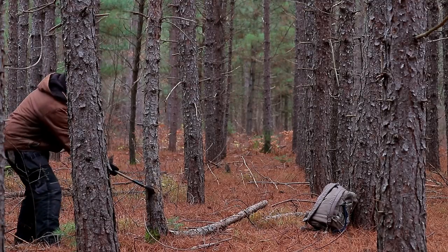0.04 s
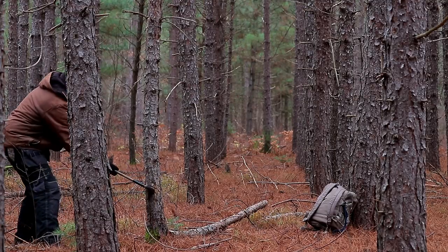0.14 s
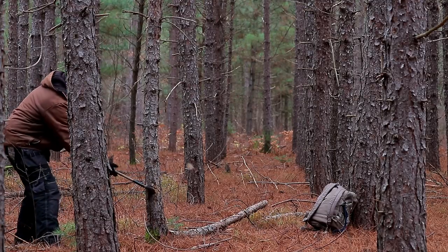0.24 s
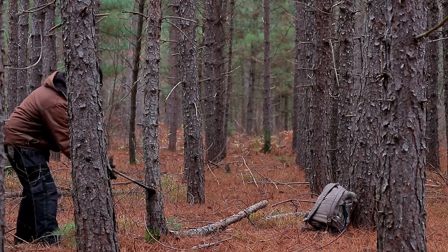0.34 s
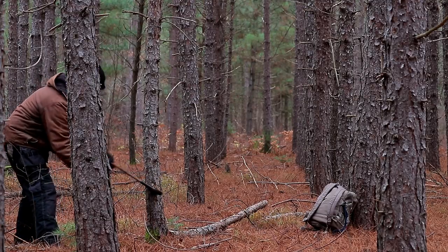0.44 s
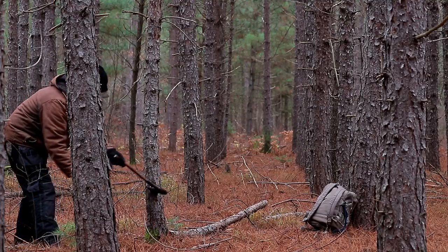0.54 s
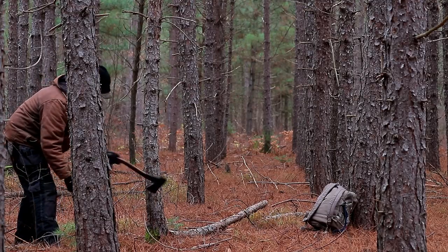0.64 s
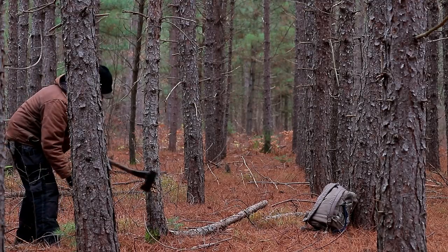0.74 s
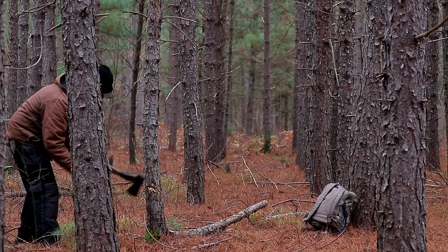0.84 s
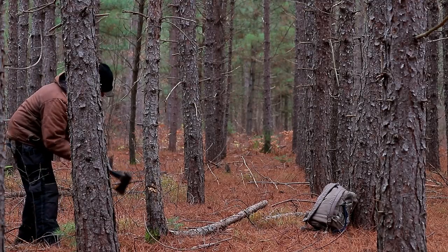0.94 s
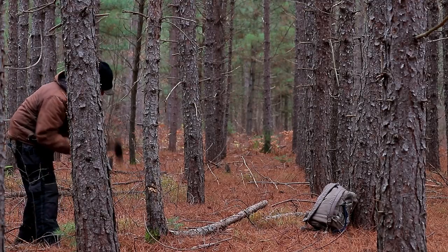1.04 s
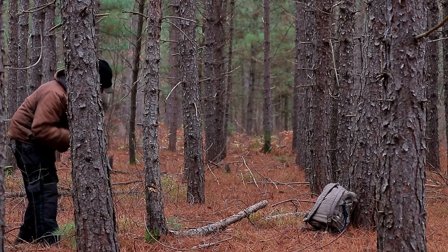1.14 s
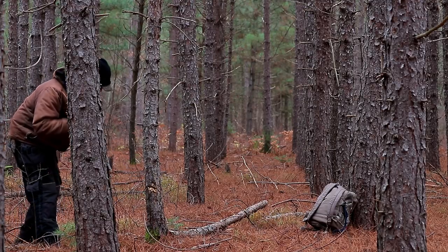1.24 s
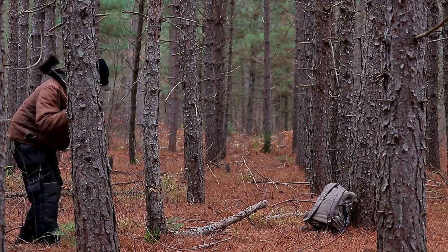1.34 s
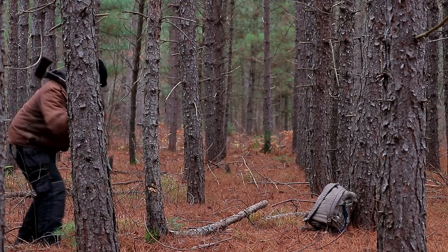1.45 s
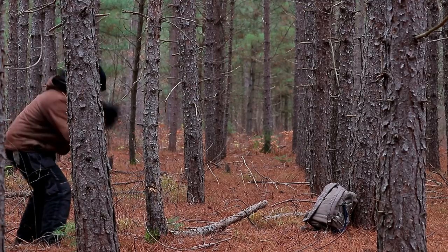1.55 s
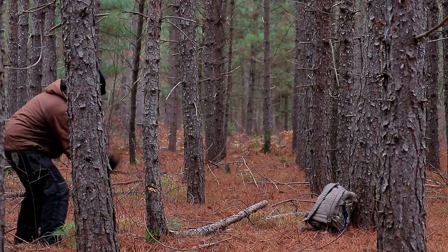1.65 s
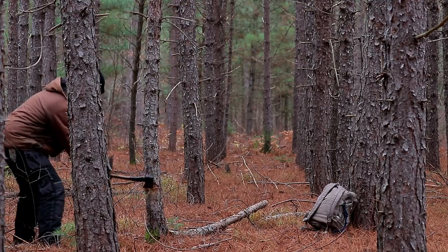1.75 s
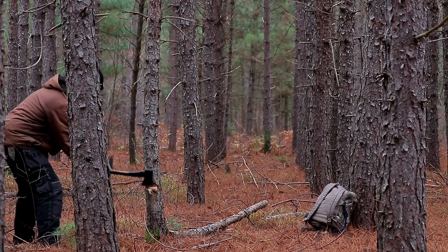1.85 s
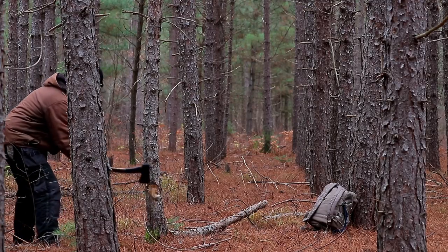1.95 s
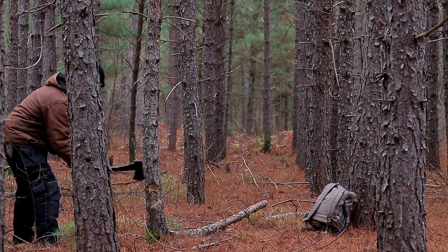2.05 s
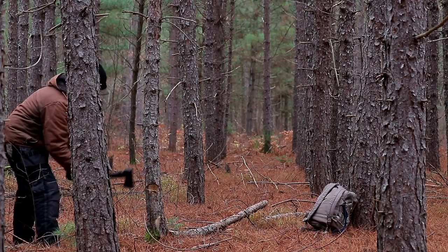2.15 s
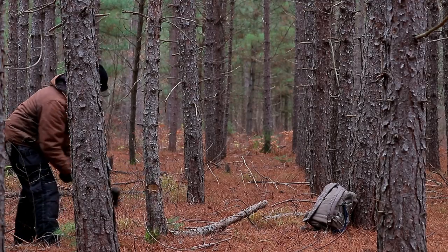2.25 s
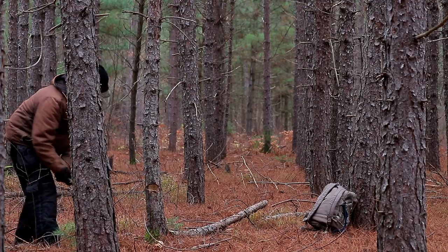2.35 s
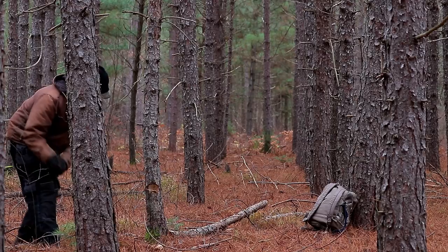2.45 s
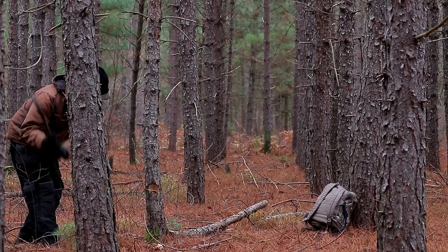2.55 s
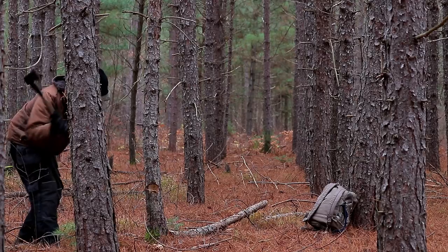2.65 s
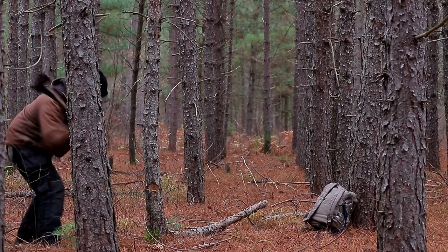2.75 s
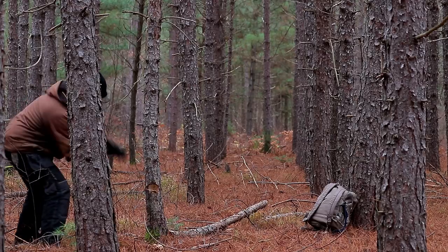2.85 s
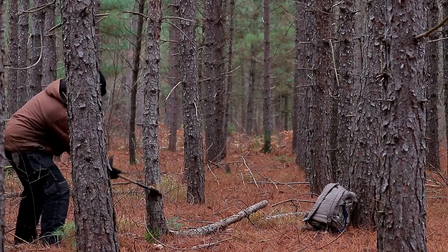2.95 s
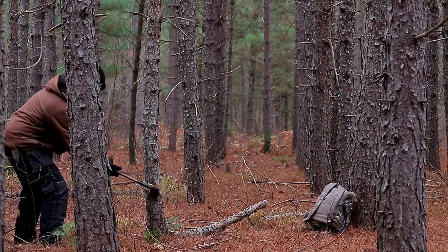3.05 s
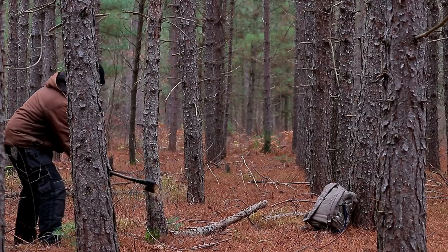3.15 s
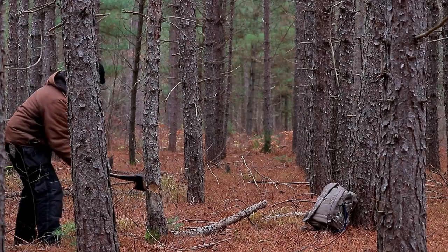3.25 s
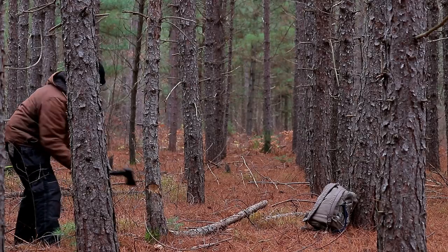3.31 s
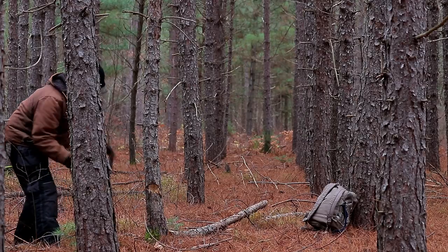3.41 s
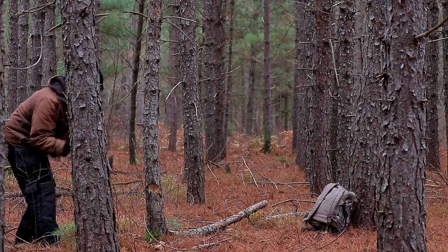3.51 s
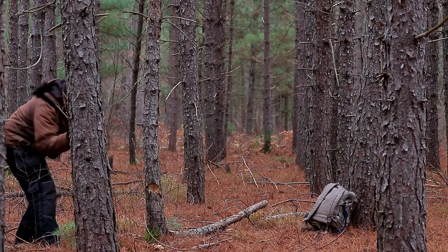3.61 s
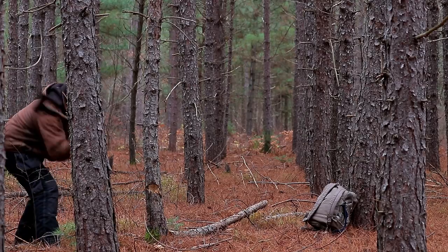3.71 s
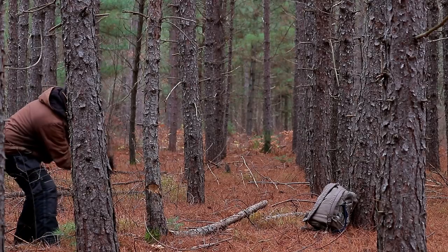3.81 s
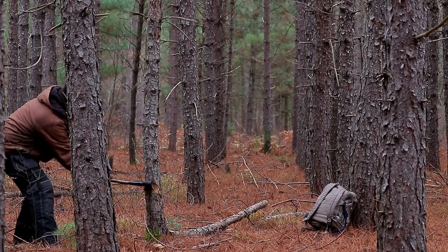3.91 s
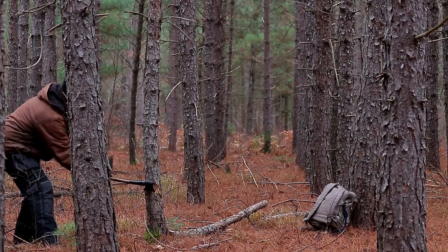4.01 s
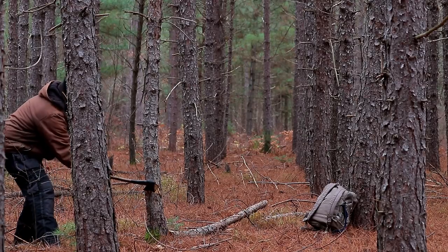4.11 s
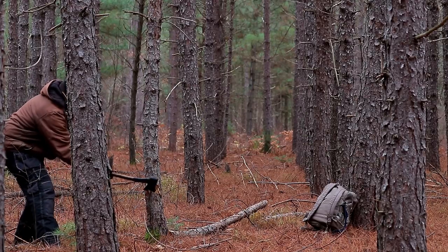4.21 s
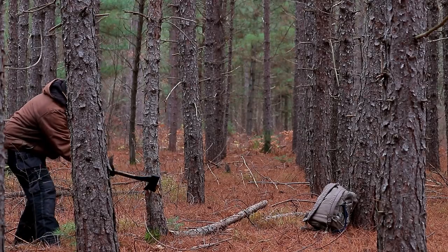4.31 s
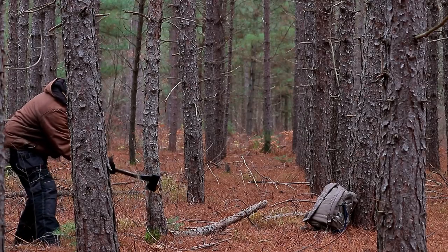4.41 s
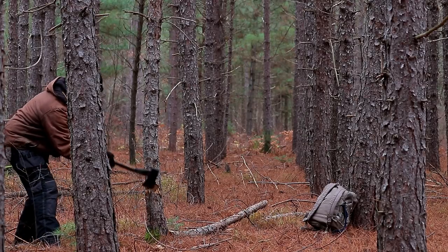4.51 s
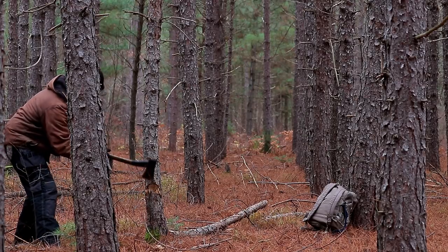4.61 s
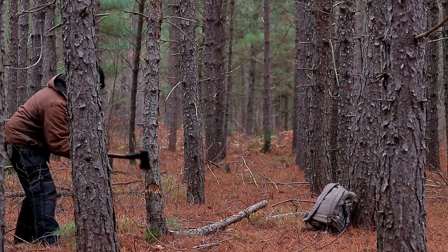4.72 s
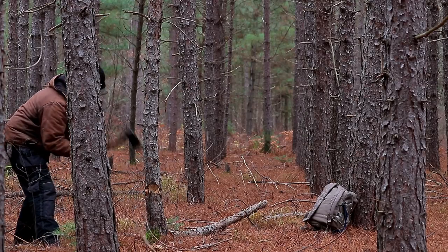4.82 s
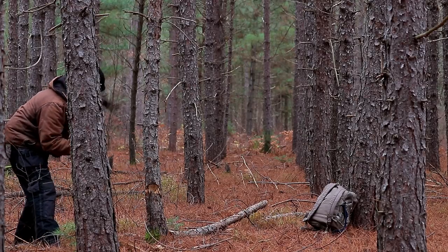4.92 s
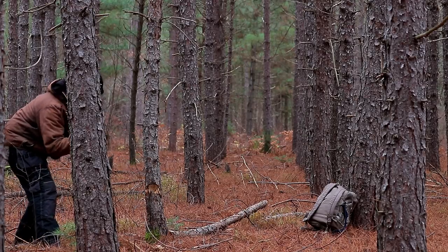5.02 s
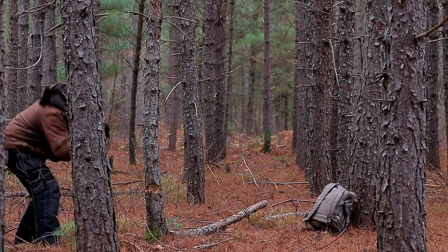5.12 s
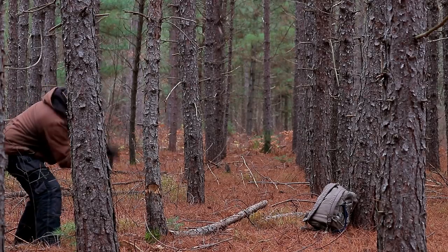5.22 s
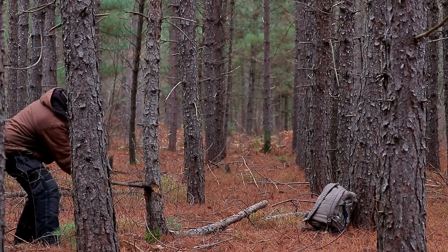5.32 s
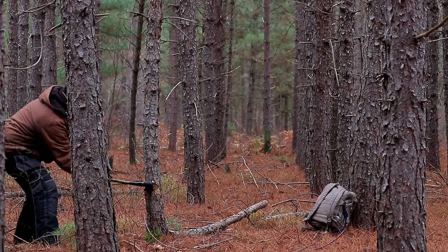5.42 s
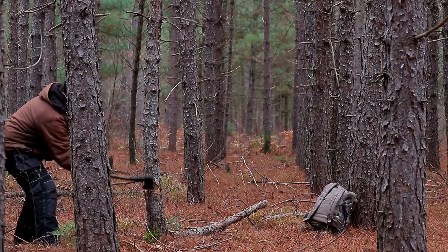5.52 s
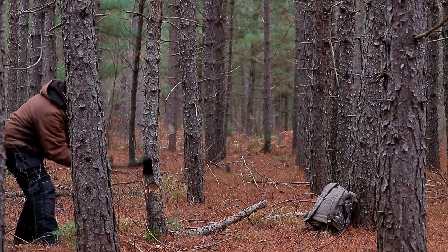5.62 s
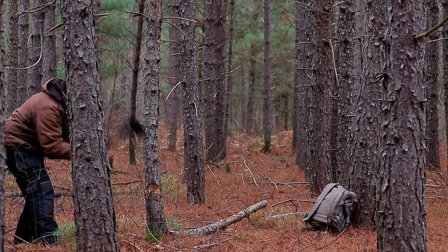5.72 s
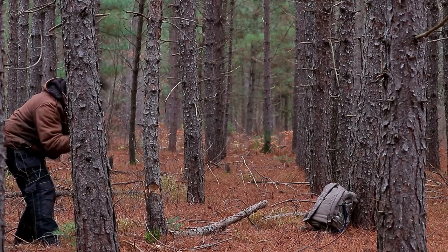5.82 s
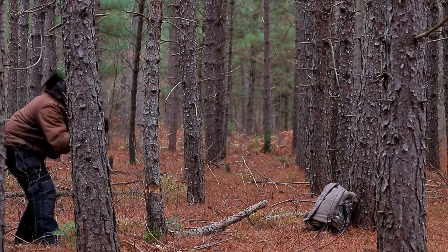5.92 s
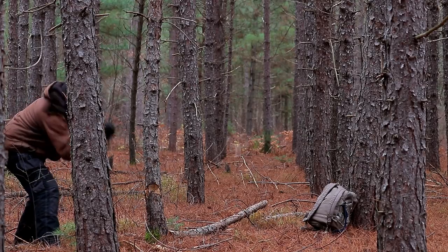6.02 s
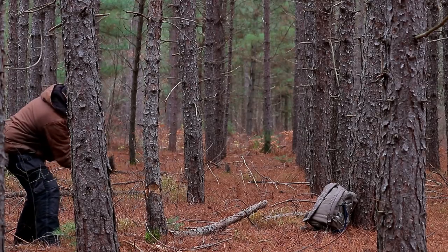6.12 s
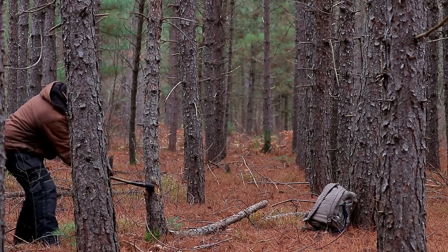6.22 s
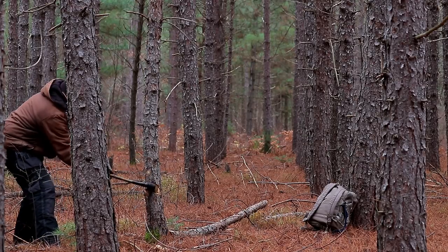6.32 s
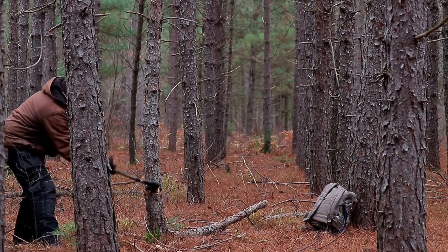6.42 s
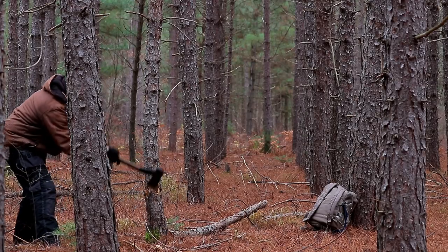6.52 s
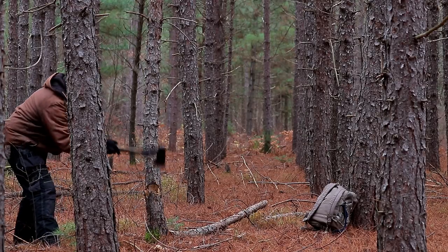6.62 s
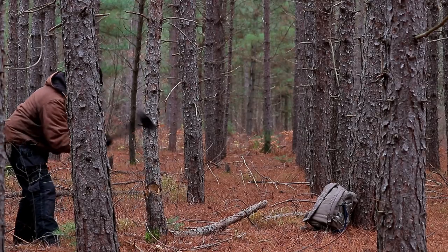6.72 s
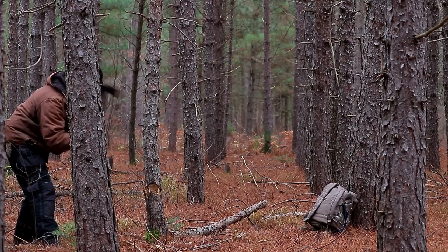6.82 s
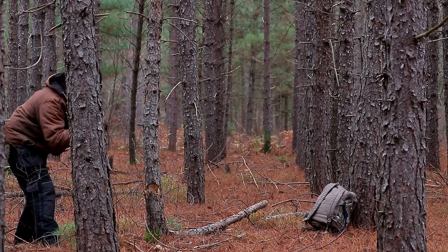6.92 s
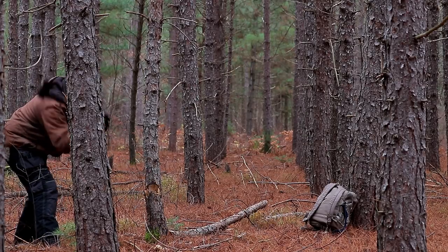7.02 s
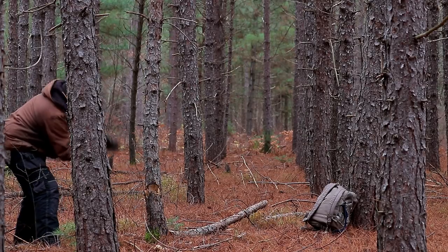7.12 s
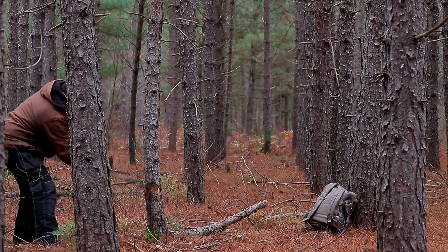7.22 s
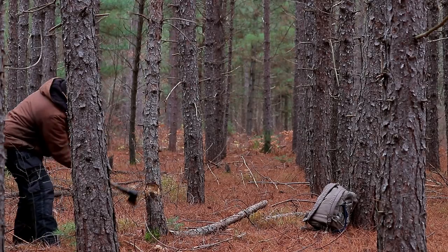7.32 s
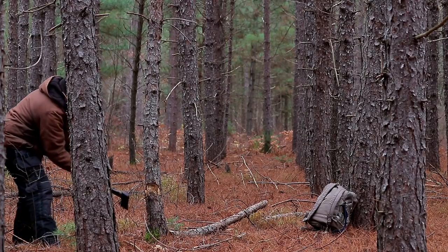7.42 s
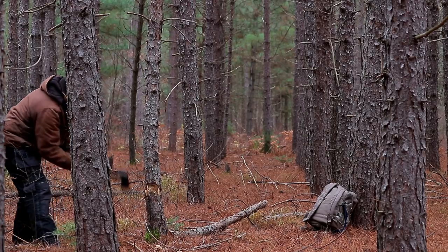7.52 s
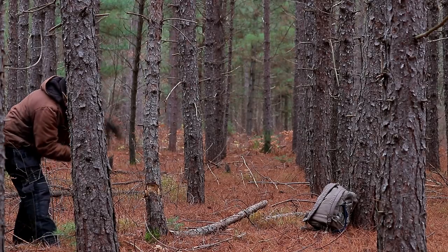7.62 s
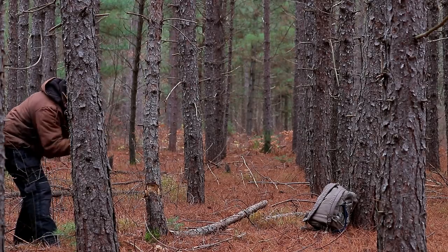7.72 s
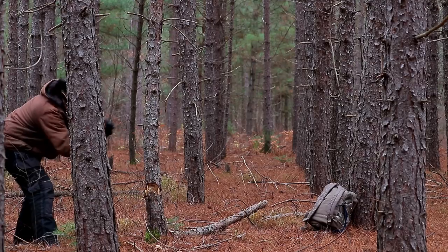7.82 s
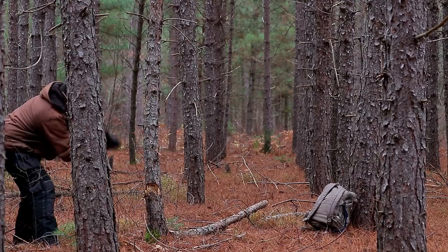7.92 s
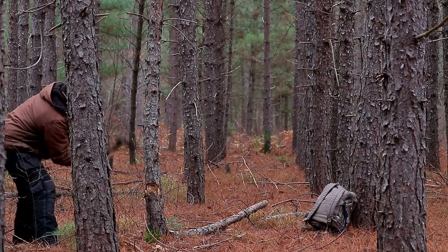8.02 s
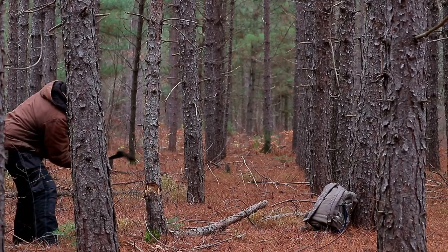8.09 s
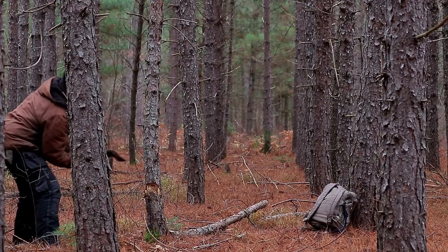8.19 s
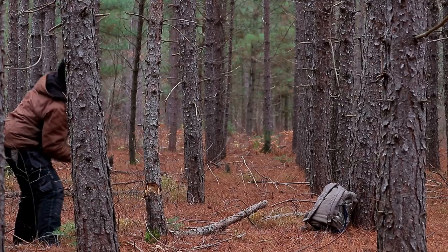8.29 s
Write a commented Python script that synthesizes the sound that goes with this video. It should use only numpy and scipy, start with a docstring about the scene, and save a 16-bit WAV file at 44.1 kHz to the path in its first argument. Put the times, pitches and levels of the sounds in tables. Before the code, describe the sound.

Quiet pine forest outdoors, medium-close microphone. Seven single axe blows bite into a living trunk, slightly over a second apart on average. Some are square, solid and knocking; others slice brighter and duller in the bass. Every hit scatters off surrounding trees and dies away quickly. Between hits come light taps of the loosened blade, chips and twigs, plus barely audible dry litter crackling, with soft far wind beneath.

```python
"""An axe blow into a standing pine is already under way at the start, a few metres off in a quiet forest.
In each of seven blows bark crumbles, torn fibres excite the modes of wood and axe head in a short
crack, and the shoved trunk answers with a low gliding thump; decaying noise is the scatter of the trees.
Under it lies a faint far rush of filtered noise. Needles and chips crackle as random grains, chips and
twigs tick as struck resonances, and after the first blow the blade squeaks twice by stick-slip."""
import sys
import numpy as np
from scipy import signal
from scipy.fft import rfft, irfft
from scipy.io import wavfile

SR = 44100
rng = np.random.default_rng(int(sys.argv[2]) if len(sys.argv) > 2 else 0)


def inscribe(sig):
    """Save sig as 16-bit PCM at rate SR to the path in sys.argv[1].

    A 1-D sig is mono; a 2-D sig holds one channel per row.
    Samples are clipped to [-1, 1] before scaling.
    """
    pcm = np.round(np.clip(np.atleast_2d(sig).T, -1, 1) * 32767)
    wavfile.write(sys.argv[1], SR, pcm.astype(np.int16))


N = 368235
TAIL = 65536        # length of each short sound and of the forest's answer [samples]
CUTOFF_HZ = 15900   # upper limit of the sound

# axe blows; slant 0 lands square, 1 slices along the grain:
# t/s, slant (0-1), crack level/dB, notch pitch f/Hz, swing level/dB, trunk ring level/dB,
# bark level/dB, falling chips level/dB
BLOWS = [(-.035, 0.47, 15.5, 1370, -12.5, -4, 0.5, -75), (1.6994, 1, 19.5, 2050, -17.5, -7, -5, -82),
         (2.9496, 0.67, 14.5, 2270, -12, -2, -3.5, -85), (3.8955, 0.14, 16, 867, -7.5, -2, -2.5, -76),
         (5.3313, .05, 18.5, 1240, -7, -3.5, 0.5, -78), (6.1837, 0.1, 16.5, 1130, -6, -5, -2.5, -78),
         (7.2314, 0.84, 11, 1250, -10, -3, 0, -81)]


def from_db(db):
    """Logarithmic level: 20 dB is a factor of ten in amplitude."""
    return 10 ** (np.asarray(db) / 20)


def rms_one(x):
    """Root-mean-square normalisation: scale to unit mean power."""
    return x / np.sqrt(np.mean(x ** 2) + 1e-20)


def at_hz(points, hz):
    """Logarithmic pitch scale: interpolate every column of a table against log frequency."""
    known, *columns = np.transpose(points)
    return [np.interp(np.log(hz), np.log(known), column) for column in columns]


def add(out, s, sound):
    """Superposition: pressures add, here from time s [s] on."""
    start = round(s * SR)
    part = sound[max(-start, 0):len(out) - start]
    first = max(start, 0)
    out[first:first + len(part)] += part


def lowpass(x, hz):
    """Causal second-order low-pass: level falls by 12 dB per octave above the corner."""
    return signal.sosfilt(signal.butter(2, hz, fs=SR, output="sos"), x)


def band(x, low_hz, high_hz):
    """Causal band-pass: only frequencies between two corners get through."""
    sos = signal.butter(2, [low_hz, high_hz], "band", fs=SR, output="sos")
    return signal.sosfilt(sos, x + 1e-18)


def resonate(x, hz, width):
    """Damped resonance with unit peak gain: the wider it is [Hz], the faster it decays."""
    r = np.exp(-np.pi * width / SR)
    zeros = np.array([1, 0, -1]) * (1 - r * r) / 2
    poles = [1, -2 * r * np.cos(2 * np.pi * hz / SR), r * r]
    return signal.lfilter(zeros, poles, x + 1e-18)


def fade(t60):
    """Exponential decay: amplitude falls by 60 dB in t60 [s]."""
    return np.exp(-np.log(1000) * np.arange(TAIL) / SR / t60)


def coloured(x, points):
    """Minimum-phase filtering by a table of f/Hz, level/dB: causal, so nothing sounds early."""
    hz = np.maximum(np.abs(np.fft.fftfreq(2 * TAIL, 1 / SR)), 1)
    level_db, = at_hz(points, hz)
    response = np.exp(signal.hilbert(np.log(from_db(level_db))).conj())
    return irfft(rfft(x, 2 * TAIL) * response[:TAIL + 1])[:TAIL]


def fracture(length_s, size=2048, count=12):
    """Broadband excitation: fibres snap in a dense burst of unit energy."""
    gate = np.exp(-(np.arange(size) / SR / length_s) ** 4)
    burst = rng.standard_normal(size) * gate
    for _ in range(count):   # each round spreads the burst more evenly over all pitches
        phase = np.angle(rfft(burst))
        burst = irfft(np.exp(1j * phase)) * gate
    return np.pad(burst / np.linalg.norm(burst), (0, TAIL - size))


def grains(per_s, spread_db):
    """Shot noise: independent tiny snaps of random sign and uneven size."""
    chance = rng.random(TAIL)
    sign = rng.choice([-1, 1], TAIL)
    size = np.minimum(rng.exponential(1, TAIL), 3)
    return (chance < per_s / SR) * sign * from_db(spread_db * size)


def bark(t60=.06, per_s=6000, spread_db=4):
    """Brittle fracture: bark breaks first and goes on crumbling as a decaying shower of snaps."""
    # colour of dry bark as it crumbles: f/Hz, level/dB
    bark_colour = [(300, 4), (1200, 11.5), (2500, 2.5), (4500, 0), (6500, -10), (9000, -15), (15000, -25)]
    crumbs = grains(per_s, spread_db) * fade(t60)
    return coloured(crumbs / np.linalg.norm(crumbs), bark_colour)


def by_slant(square, slicing, slant):
    """Linear blend from the value of a square blow to that of a slicing blow."""
    return np.interp(slant, [0, 1], [square, slicing])


def crack_colour(crack_db, slant, notch_hz, notch_db, notch_octaves=.18):
    """Resonant colouring: brighter with slant, with a hump where the chip being split off rings."""
    # crack of the wood: f/Hz, level of a square blow/dB, level of a slicing blow/dB
    crack_levels = [(500, 3.5, -6), (800, 2, -7), (1396.6, 2, -2), (2139, -3, -1.5), (3910, -12, 3),
                    (5100, -20, -8.5), (7958, -29.5, -21.5), (15900, -41.5, -41)]
    hz = np.geomspace(300, CUTOFF_HZ, 120)
    square, slicing = at_hz(crack_levels, hz)
    off_pitch = np.log2(hz / notch_hz) / notch_octaves
    hump = notch_db / (1 + off_pitch ** 2)
    return np.column_stack([hz, crack_db + square + slant * (slicing - square) + hump])


def crack(bite_s, colour, uneven_db=1.5):
    """Modal excitation: the blade tears into the notch; where it lands decides which modes speak."""
    # modes of notch and axe head: f/Hz, width/Hz, level/dB
    notch_modes = [(403, 110, 3.5), (720, 120, 3.5), (940, 180, 2.5), (1154, 270, -2), (1440, 220, 3),
                   (2000, 280, 3), (2376, 240, -1), (2647, 78, 1), (3190, 170, -3.5), (3400, 220, -6),
                   (3950, 340, 5), (4470, 300, 0.5), (5030, 350, -1.5), (5940, 1500, -12.5),
                   (6500, 170, -0.5), (7000, 500, -2), (8200, 430, -2.5), (10800, 3000, -8),
                   (13900, 4600, -12)]
    burst = fracture(bite_s, count=6)
    ring = np.zeros(TAIL)
    for hz, width, db in notch_modes:
        mode_db = db + uneven_db * rng.standard_normal()
        ring += from_db(mode_db) * resonate(burst, hz, width)
    return coloured(ring, colour)


def thump(swing_db, ring_db, shove_s, start_hz=205, end_hz=90, glide_s=.008, swell_s=0.0039, echo_hz=500):
    """Dispersive bending: the shoved trunk swings once, then rings in its modes; a slow shove is duller."""
    # bending modes of the trunk: f/Hz, level/dB, t60/s
    bending_modes = [(77.2, -21, 0.27), (100.2, -22, 0.22), (116.06, -25, 0.24), (146.1, -26, 0.23),
                     (205, -18, 0.12), (238.5, -18, 0.069)]
    # echoes off the nearest trees: delay t/s, level/dB
    near_trees = [(0.011, -16.5), (0.0204, -13), (0.052, -25.5)]
    t = np.arange(TAIL) / SR
    # short bending waves travel fastest and arrive first, so the pitch glides down
    hz = end_hz + (start_hz - end_hz) * np.exp(-t / glide_s)
    swell = (t / swell_s * np.exp(1 - t / swell_s)) ** 2
    swing = from_db(swing_db) * np.sin(2 * np.pi * np.cumsum(hz) / SR) * swell
    modes = sum(from_db(ring_db + db) * fade(t60) * np.sin(2 * np.pi * f * t) for f, db, t60 in bending_modes)
    build_up = 1 - fade(.05)
    shove = np.sin(np.pi * np.minimum(t / shove_s, 1)) ** 2
    direct = signal.fftconvolve(swing + build_up * modes, shove / shove.sum())[:TAIL]
    out, dull = direct.copy(), lowpass(direct, echo_hz)
    for delay_s, db in near_trees:
        add(out, delay_s, from_db(db) * dull)
    return out


def over_ground(x, delay_s=.00082, bounce_db=-11.5, top_hz=3600):
    """Comb interference: direct sound meets its duller bounce off the needle-covered ground."""
    out, gain = x.copy(), from_db(bounce_db)
    add(out, delay_s, gain * lowpass(x, top_hz))
    return out / np.hypot(1, gain)


def forest():
    """Multiple scattering: a quick answer off near trunks, then a far tail, decaying band by band."""
    # scatter among the trunks, levels before band filtering:
    # f/Hz, early level/dB, early t60/s, late level/dB, late t60/s
    scatter = [(59.94, -13, 1, -38, .7), (197, -16.5, 0.34, -32, 0.46), (475, -5, 0.16, -20.5, 1.5),
               (1220, -12, .35, -19, 2.2), (2329.4, -9.5, 0.18, -19.5, 1.2), (4500, -17.5, 0.23, -21, 0.53),
               (8000, -8, 0.3, -9.5, 0.27), (15000, -7.5, 0.22, -19, 0.28)]
    edges = np.geomspace(45, 20000, 19)   # band limits [Hz]
    near = rng.standard_normal((2, TAIL))
    far = rng.standard_normal((2, TAIL))
    out = np.zeros(TAIL)
    for k, (low, high) in enumerate(zip(edges, edges[1:])):
        early_db, early_t60, late_db, late_t60 = at_hz(scatter, np.sqrt(low * high))
        # neighbouring bands take different noise
        early = near[k % 2] * fade(early_t60)
        late = far[k % 2] * fade(late_t60)
        early *= from_db(early_db) / np.linalg.norm(early)
        late *= from_db(late_db) / np.linalg.norm(late)
        out += band(early + late, low, high)
    return out * (1 - fade(0.017))   # soft onset


def chopping(lowest_hz=48, ring_share_db=-8, spread_share_db=1, return_db=-1.28):
    """Impact radiation: bark, crack and thump of each blow, convolved with the answer of the forest."""
    out = np.zeros(N)
    for s, slant, crack_db, notch_hz, swing_db, ring_db, bark_db, _ in BLOWS:
        # a slicing blow bites longer, shoves more slowly and is through the bark sooner
        bite_s = by_slant(.0024, .0044, slant)
        shove_s = by_slant(0.00048, .0056, slant)
        lead_s = by_slant(0.0031, 0.001289, slant)
        colour = crack_colour(crack_db, slant, notch_hz, notch_db=8)
        spread_colour = crack_colour(crack_db, slant, notch_hz, notch_db=4.5)   # averaged over directions

        cut, trunk = from_db(bark_db) * bark(), np.zeros(TAIL)
        add(cut, lead_s, crack(bite_s, colour))
        add(trunk, lead_s, thump(swing_db, ring_db, shove_s))
        add(out, s - lead_s, over_ground(cut) + trunk)

        # sound leaving in other directions returns later, and its mode peaks average out
        around = from_db(ring_share_db) * cut + trunk
        spread = band(coloured(fracture(bite_s), spread_colour), 350, 15000)
        add(around, lead_s + 0.0092, from_db(spread_share_db) * spread)
        add(out, s - lead_s, from_db(return_db) * signal.fftconvolve(around, forest()))
    # a slim trunk radiates no deep bass
    return signal.sosfilt(signal.butter(2, lowest_hz, "high", fs=SR, output="sos"), out)


def air(rush_db=-61):
    """Stationary noise: a steady far rush in the crowns, shaped in frequency, with narrow humps on top."""
    # spectrum of the far air, relative per Hz: f/Hz, level/dB
    rush_colour = [(15, -64), (25, -20), (43, -22.5), (74, -2.5), (134, -6), (190, -18.5), (384, -5.5),
                   (489, -10), (575, -10), (911, -11.5), (1130, -13.5), (2280, -28.5), (3820, -38.5),
                   (5140, -43.5), (16000, -47)]
    # narrow humps in the far rush: f/Hz, width/Hz, rms level/dB
    humps = [(82, 25, -86), (355, 140, -66), (3850, 500, -86.5)]
    hz = np.maximum(np.fft.rfftfreq(N, 1 / SR), 1)
    level_db, = at_hz(rush_colour, hz)
    noise = irfft(rfft(rng.standard_normal(N)) * from_db(level_db), N)
    rush = from_db(rush_db) * rms_one(noise)
    for f, width, db in humps:
        hump = band(rng.standard_normal(N), f - width / 2, f + width / 2)
        rush += from_db(db) * rms_one(hump)
    return rush


def rustles(count=6, flight_s=0.19, fall_s=0.51, clump_s=.07, brace_lead_s=0.041, brace_s=.04, brace_db=-76):
    """Free fall delays the chips: a boot presses before each blow, clumps land after it (t/s, length/s, dB)."""
    rows = []
    for s, *_, chips_db in BLOWS:
        rows.append((s - brace_lead_s, brace_s, brace_db))
        landings = s + flight_s + fall_s * (np.arange(count) + rng.random(count)) / count
        rows += [(landing, clump_s, chips_db) for landing in landings]
    return rows


def litter(per_s=900, spread_db=5):
    """Granular crackle: dry needles snap in soft clumps under shifting boots and falling chips."""
    out, t = np.zeros(N), np.arange(TAIL) / SR
    for s, length_s, db in rustles():
        crackle = rms_one(band(grains(per_s, spread_db), 1400, 5500))
        swell = np.sin(np.pi * np.minimum(t / length_s, 1))
        add(out, s, from_db(db) * crackle * swell)
    return out


def twigs(every_s=0.4, peak_db=-58.5, centre_hz=3900, spread_octaves=.2):
    """Jittered timing: one faint tick at a random moment of each interval (t/s, peak level/dB, f/Hz)."""
    rows = []
    for start in np.arange(0, N / SR, every_s)[:-1]:
        hz = centre_hz * 2 ** (spread_octaves * rng.uniform(-1, 1))
        rows.append((start + every_s * rng.random(), peak_db, hz))
    return rows


def ticks(snap_s=.002, upper_db=-9, body_hz=1400, body_width=800, body_db=-4, edge_db=-20, reach_hz=2300):
    """Impulse response of small dry wood: a brief snap rings two resonances over a woody body."""
    # the clearest knocks of chips, twigs and the loosened blade: t/s, peak level/dB, f/Hz
    knocks = [(.439, -59, 4500), (0.538, -50, 2600), (0.637, -46.5, 1535), (0.72, -53, 3900),
              (3.154, -47, 4400), (3.229, -49, 4400), (4.098, -38.5, 1583), (4.123, -42.5, 4900),
              (4.257, -48, 3290), (4.402, -35.5, 1030), (4.4031, -40, 3850), (5.803, -49, 3370),
              (5.97, -49, 3984), (6.354, -45.5, 7300), (6.513, -41.5, 2300), (6.831, -54.5, 4265),
              (7.2492, -18, 2963), (7.299, -43.5, 9800), (8.014, -38, 2420), (8.155, -46, 3710)]
    out = np.zeros(N)
    for s, db, hz in knocks + twigs():
        snap = fracture(snap_s, count=2)
        width = hz / 4
        ring = resonate(snap, hz, width) - from_db(upper_db) * resonate(snap, 2 * hz, width)
        body = from_db(body_db) * resonate(snap, body_hz, body_width)
        edge = from_db(edge_db) * snap
        tick = band(ring - body + edge, 700, hz + reach_hz)
        add(out, s, from_db(db) * tick / np.abs(tick).max())
    return out


def squeaks(slips_per_s=440, rise_per_s=7, jitter=0.24, width_hz=330, upper_db=-18):
    """Stick-slip friction: steel slips unevenly and ever faster on damp wood and rings the notch."""
    # the blade rubs free of the cut: t/s, length/s, level/dB, f/Hz
    rubs = [(0.348, .034, -48, 1051), (0.384, .036, -50.5, 957.7)]
    out, t = np.zeros(N), np.arange(TAIL) / SR
    for s, length_s, db, hz in rubs:
        uneven = jitter * np.repeat(rng.standard_normal(TAIL // 128), 128)
        rate = slips_per_s * (1 + rise_per_s * np.minimum(t, length_s) + uneven)
        turns = np.cumsum(rate) / SR
        slips = np.diff(np.floor(turns), prepend=0)   # one pulse per whole turn
        lower = band(resonate(slips, hz, width_hz), 600, 1600)
        upper = band(resonate(slips, 2 * hz, 480), 580, 4700)
        swell = np.sin(np.pi * np.sqrt(np.minimum(t / length_s, 1)))
        add(out, s, from_db(db) * rms_one(lower + from_db(upper_db) * upper) * swell)
    return out


def scene():
    """Superposition of blows, air and small wood sounds, all in the same stand of pines."""
    small = litter() + ticks() + squeaks()
    small_echo = from_db(4.5) * signal.fftconvolve(small, forest())[:N]
    return (chopping() + air() + small + small_echo)[None]


def record(dry):
    """Overload and band limit: anything beyond full scale is clipped, then the top is cut."""
    clipped = np.clip(dry, -1, 1)
    return signal.sosfilt(signal.ellip(10, .1, 80, CUTOFF_HZ, fs=SR, output="sos"), clipped)


dry = scene()
out = record(dry)
inscribe(out)
```